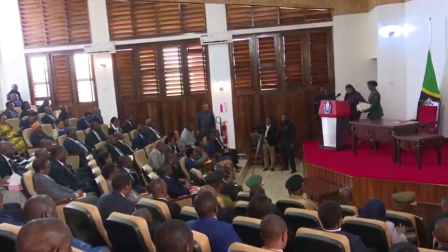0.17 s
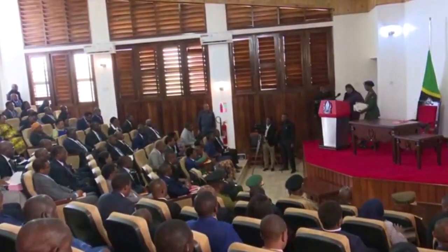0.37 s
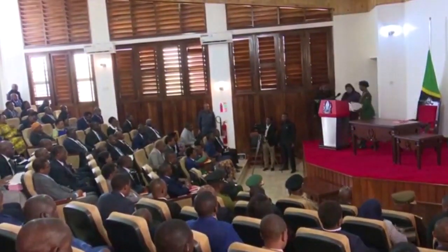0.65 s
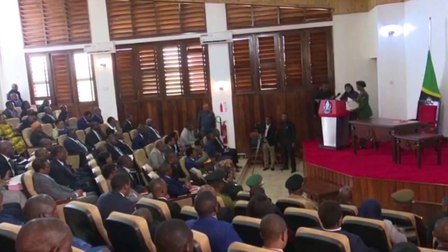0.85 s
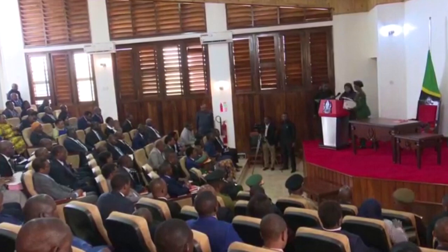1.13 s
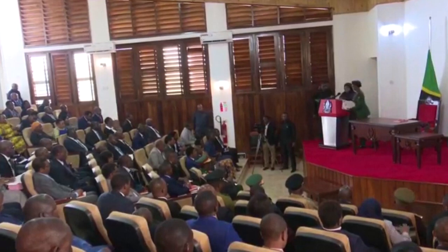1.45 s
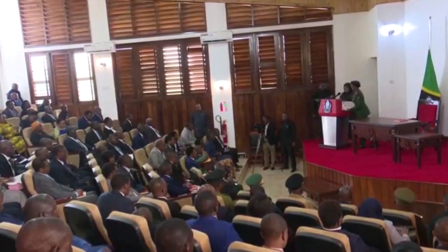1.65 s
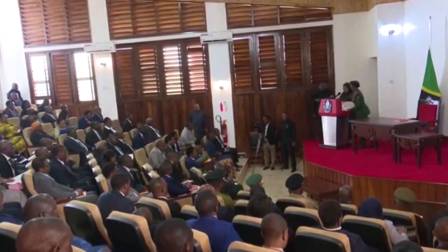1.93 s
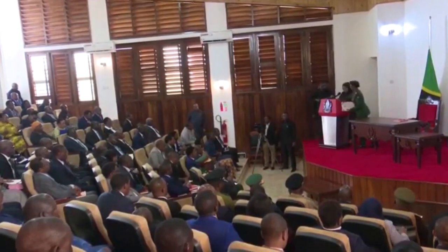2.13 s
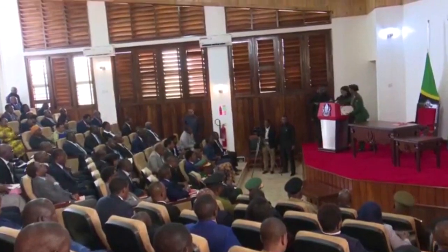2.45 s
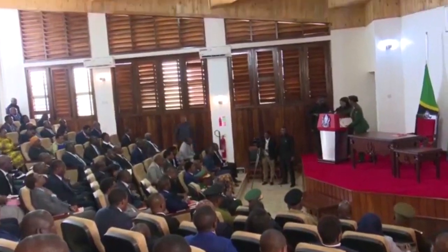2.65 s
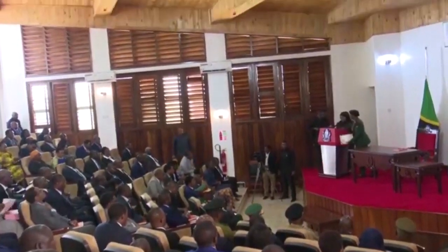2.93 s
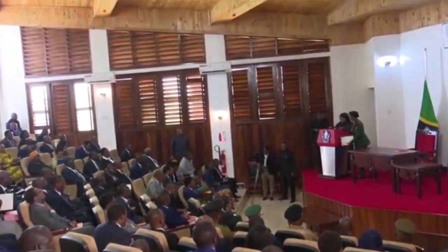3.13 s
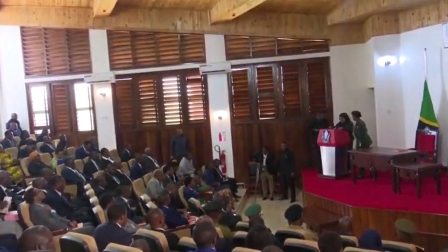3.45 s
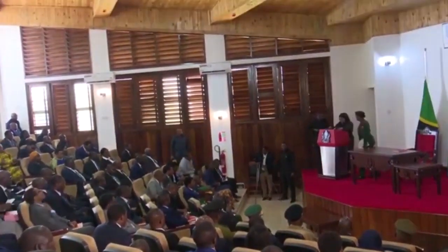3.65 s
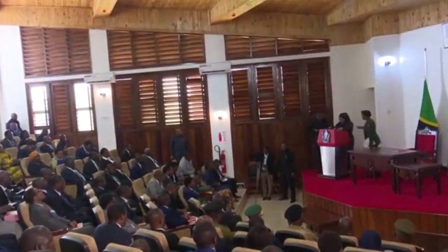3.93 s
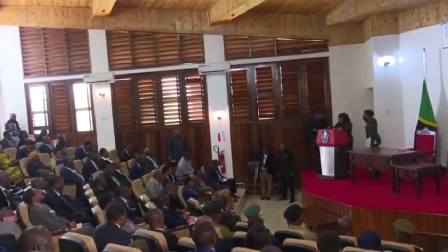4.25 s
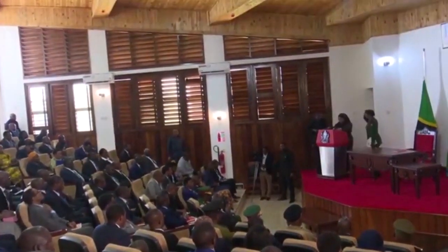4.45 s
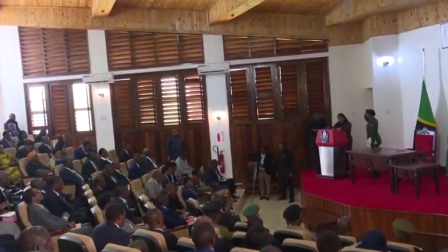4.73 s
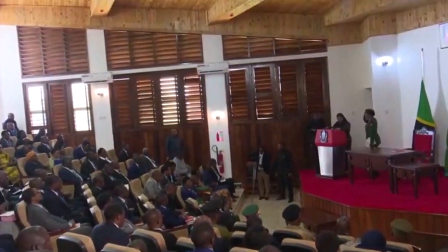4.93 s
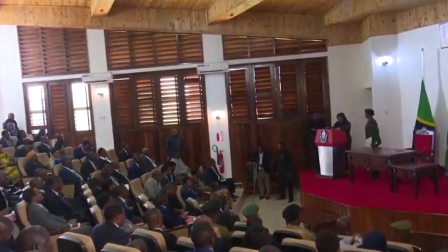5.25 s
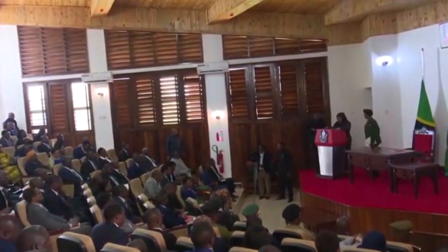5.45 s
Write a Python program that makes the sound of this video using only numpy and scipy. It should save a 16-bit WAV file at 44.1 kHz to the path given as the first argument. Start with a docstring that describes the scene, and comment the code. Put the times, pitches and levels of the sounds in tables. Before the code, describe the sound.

A live microphone on a hall lectern is adjusted by hand. After almost a second of plain hum, whine and hiss, dull low thumps come in a quick cluster, with strong booms near 1.5 and 2.1 seconds. They thin out, bunch again around 3.6, and one heavy boom lands at 5. A sharp plastic click stands out near 4.4. Close, mono, direct from the sound system.

```python
"""In a hall, a lectern microphone is adjusted while it is live on the public address system.
Each nudge booms dully through the stand as a swelling, dying low resonance with an overtone.
Fingers rustle faintly as shaped noise, and the holder clicks a few times in short noise bursts.
Under it the system hums in mains harmonics, buzzes twice a cycle in treble rings,
whines on one steady note and hisses in coloured noise."""
import sys
import numpy as np
from scipy import signal
from scipy.fft import rfft, irfft
from scipy.io import wavfile

SR = 44100
rng = np.random.default_rng(int(sys.argv[2]) if len(sys.argv) > 2 else 0)


def wav_out(sig):
    """Save sig, one row per channel (or a flat mono array), as 16-bit PCM at SR to the path in sys.argv[1]."""
    wavfile.write(sys.argv[1], SR, np.round(np.clip(np.atleast_2d(sig).T, -1, 1) * 32767).astype(np.int16))


N = 246078
TIME = np.arange(N) / SR  # s
MAINS_HZ = 50.124


def amp(db):
    """Decibels to gain."""
    return 10 ** (np.asarray(db) / 20)


def evened(x):
    """Scales to an rms of 1."""
    return x / np.sqrt(np.mean(abs(x) ** 2) + 1e-20)


def noise(points):
    """Gaussian noise whose power density follows points of (frequency_hz, density_db_per_hz)."""
    hz, db = np.transpose(points)
    bins = np.fft.rfftfreq(N, 1 / SR) + 1
    colour = np.interp(np.log(bins), np.log(hz), db)
    white = rfft(rng.standard_normal(N))
    return irfft(white * amp(colour), N) * np.sqrt(SR / 2)


def drift(rate_hz):
    """Random wandering of rms 1: noise that rolls off smoothly around the given rate."""
    roll_off = np.exp(-(np.fft.rfftfreq(N, 1 / SR) / rate_hz) ** 2)
    return evened(irfft(rfft(rng.standard_normal(N)) * roll_off, N))


def add(mix, start_s, sound):
    """Mixes a sound in from start_s, cut off at the end of the mix."""
    part = mix[round(start_s * SR):][:len(sound)]
    part += sound[:len(part)]


def hum(trim_db=-2.0, delay_s=0.00362):
    """Mains harmonics line up into one kick each half cycle."""
    # hum of the sound system: multiple of the mains, level_db (rms, before the trim)
    harmonics = [(4, -57.4), (5, -51.8), (6, -59.0), (7, -55.6), (8, -64.9), (9, -59.5), (10, -67.8),
                 (11, -62.8), (12, -66.6), (13, -65.1), (14, -71.1), (15, -65.7), (16, -71.2), (17, -66.4),
                 (18, -78.9), (19, -66.4), (20, -82.8), (21, -70.2), (23, -72.4), (24, -79.1), (25, -71.9),
                 (27, -79.6), (29, -79.3), (31, -76.8), (33, -81.7), (35, -83.2), (37, -84.3)]
    turns = MAINS_HZ * (TIME - delay_s)
    total = sum(amp(db) * np.cos(2 * np.pi * k * turns) for k, db in harmonics)
    return amp(trim_db) * np.sqrt(2) * total


def whine(trim_db=1, pitch_hz=429.87, waver_turns=0.0086):
    """A steady electronic tone with clean overtones, all sharing one slight waver of phase."""
    # partials of the whine: multiple of the pitch, level_db (rms, before the trim)
    partials = [(1, -47.5), (2, -59), (3, -69.5), (4, -66), (5, -76.5), (6, -74.5), (7, -75)]
    turns = pitch_hz * TIME + waver_turns * drift(2.4)
    total = sum(amp(db) * np.cos(2 * np.pi * (k * turns + rng.random())) for k, db in partials)
    return amp(trim_db) * np.sqrt(2) * total


def buzz(beat_hz=15.5, beat_swing_rad=0.72, wander_rad=0.6):
    """Short treble rings locked to the mains, flipping sign each half cycle, with an uneven beat."""
    # switching spikes in every half cycle of the mains:
    # delay_s, ring_hz, half_length_s (to 1/e), level_db (rms), random share (0-1)
    spikes = [(.0089, 4084, 0.0009, -62, 0.31), (.0022, 3980, 0.0007, -69, 0.9),
              (0.011, 10970, 0.00038, -76, 0), (0.0022, 8060, 0.00049, -72, 0.83)]
    out = np.zeros(N)
    for delay_s, ring_hz, half_length_s, db, share in spikes:
        halves = 2 * MAINS_HZ * (TIME - delay_s)
        nearest = np.round(halves)
        t = (halves - nearest) / (2 * MAINS_HZ)  # time from the nearest spike
        beat = 2 * np.pi * beat_hz * TIME + drift(2.3)
        strength = 1 + 0.25 * np.cos(beat + drift(10)) + 0.15 * drift(60)
        phase = beat_swing_rad * np.sin(beat) + wander_rad * drift(2.2) + np.pi * nearest
        sway = strength * np.exp(1j * phase)
        fizz = evened(drift(450) + 1j * drift(450))
        blend = np.sqrt(1 - share ** 2) * sway + share * fizz
        ring = (blend * np.exp(2j * np.pi * ring_hz * t)).real
        out += amp(db) * evened(ring * np.exp(-(t / half_length_s) ** 2))
    return out


def hiss(swell_db=0.68):
    """The rumble of the hall and the hiss of the amplifier, as one noise with a drifting level."""
    # colour of rumble and hiss: frequency_hz, density_db_per_hz
    colour = [(25, -98), (60, -84), (155, -63.5), (215, -73.5), (300, -77), (600, -86), (1200, -90.5),
              (2500, -97), (4300, -99), (7100, -105), (7700, -99), (8800, -100), (9400, -109),
              (14300, -114)]
    return noise(colour) * amp(swell_db * drift(9.5))


def thumps(tail_db=-29, tail_t60_s=0.63):
    """Nudges and jiggles boom through the stand; the hall returns a faint tail of decaying noise."""
    # nudges of the microphone: peak_s, level_db (main push at its peak), pitch_hz,
    # rise_s (from half height), fall_s (to half height), rebound_db (relative to the push),
    # overtone_db (relative, before the overtone's trim)
    nudges = [(0.924, -25.5, 136, 0.025, 0.015, -25, -16.5),
              (1.0382, -15.5, 131, 0.0063, 0.0063, -8.5, -29),
              (1.1243, -19.5, 162.6, 0.013, 0.0046, -28, -26), (1.184, -28.5, 150, 0.0097, 0.011, -20, -28),
              (1.245, -22.5, 137, 0.0089, 0.0058, 1.5, -37), (1.3646, -19, 139, 0.0063, 0.0079, -29, -31),
              (1.438, -27, 142, 0.0084, .008, -13, -17.5), (1.49, -4, 135.2, .015, 0.017, -29, -19.5),
              (1.56, -18.5, 144, 0.013, 0.0041, 4.5, -17), (1.6446, -23, 137, 0.0094, 0.0075, -10, -28),
              (1.723, -14.5, 130, 0.0055, 0.008, -13, -16), (1.83, -27, 147, 0.0046, .016, -14, -18.5),
              (2.0925, -7, 111.4, .011, 0.0056, -16, -12.5), (2.1975, -24.5, 121, 0.0085, 0.004, -7, -16),
              (2.3934, -18, 128, .011, .011, -25, -25), (2.479, -19, 138, 0.0043, 0.012, -16, -37),
              (2.7883, -16.7, 141.6, 0.0065, 0.0089, -22, -35), (3.068, -31, 145, 0.0069, .006, -20, -14),
              (3.5037, -12.5, 144, 0.0061, 0.0085, -13, -34), (3.566, -22.3, 145, .0042, 0.0077, -20, -34),
              (3.628, -18, 168, 0.007, 0.01, -3, -31), (3.703, -18, 128, 0.013, .007, -1.5, -26),
              (3.7761, -19.5, 149, 0.0077, 0.0071, -3, -33), (3.866, -20.5, 137, .005, 0.0086, -19, -24),
              (4.2003, -25, 130.5, 0.0072, .012, -23, -12.5), (4.356, -25.5, 130, 0.0051, 0.0069, 7, -21),
              (4.763, -32, 144, 0.01, .006, -16, -23), (5.0108, -3, 123.4, 0.0095, 0.0087, -5.5, -29),
              (5.0865, -13, 134.4, 0.0057, 0.02, -25, -27), (5.2943, -25.5, 130, 0.0078, .012, -20, -21.5),
              (5.4856, -26.5, 137, .008, 0.0061, -32, -16.5)]
    out = np.zeros(N)
    for row in [*nudges, *jiggles()]:
        add(out, *nudge(*row))
    t = TIME[:SR]
    tail = rng.standard_normal(SR) * amp(-60 * t / tail_t60_s) * (t > 0.02)
    boom = signal.fftconvolve(out, tail / np.linalg.norm(tail))[:N]
    return out + amp(tail_db) * boom


def jiggles(count=120, rate_per_s=11, half_width_s=0.012):
    """Faint nudges at uneven moments for as long as the hand is on the stand."""
    # the hand rests on the stand and jiggles it: start_s, end_s, typical level_db, typical pitch_hz
    handling = [(.45, 0.831, -37, 177), (0.828, 2.35, -32, 142.6), (2.35, 3.5, -39, 143),
                (3.5, 3.9, -33, 139), (3.9, 4.15, -36, 184), (4.15, 5.5, -38, 137.6)]
    spread_db, spread_octaves = 2.5, 0.16  # furthest either way
    rebound_db, overtone_db = -11.5, -21.5
    for k, (late, size, pitch) in enumerate(rng.uniform(-1, 1, (count, 3))):
        s = (k + late / 2) / rate_per_s
        for start_s, end_s, db, hz in handling:
            if start_s <= s < end_s:
                level_db = db + spread_db * size
                pitch_hz = hz * 2 ** (spread_octaves * pitch)
                yield s, level_db, pitch_hz, half_width_s, half_width_s, rebound_db, overtone_db


def nudge(peak_s, level_db, pitch_hz, rise_s, fall_s, rebound_db, overtone_db):
    """The hand pushes the stand, which then rocks back once at a pitch of its own."""
    rebound_lag_s, rebound_hz = 0.022, 135.3
    rebound_rise_s, rebound_fall_s = 0.0087, 0.0087  # from and to half height
    t = np.arange(-0.06, 0.14, 1 / SR)
    first = push(t, pitch_hz, rise_s, fall_s, overtone_db)
    rebound = push(t - rebound_lag_s, rebound_hz, rebound_rise_s, rebound_fall_s, overtone_db)
    return peak_s + t[0], amp(level_db) * (first + amp(rebound_db) * rebound)


def push(t, pitch_hz, rise_s, fall_s, overtone_db, trim_db=-1, lead=0.26, sag=0.07, sag_s=0.011):
    """One push swells and dies in two low resonances of the stand, the main one peaking at t = 0."""
    second_hz = 247.7  # second resonance of the stand
    # the pitch sags a little as the hand lets go
    turn = 2 * np.pi * (t - sag * sag_s * np.log(np.cosh(t / sag_s)))
    # the overtone peaks early, while the hand still pushes; its lead is a share of the rise
    early = swell(t + lead * rise_s, rise_s, fall_s)
    overtone = amp(overtone_db + trim_db) * early * np.cos(second_hz * turn)
    return swell(t, rise_s, fall_s) * np.cos(pitch_hz * turn) + overtone


def swell(t, rise_s, fall_s):
    """A bell-shaped rise from half height to 1 at t = 0, then a ringing decay's envelope."""
    rising = 2 ** -((t / rise_s) ** 2)
    falling = 1 / np.cosh(np.arccosh(2) * t / fall_s)
    return np.where(t < 0, rising, falling)


def rub(grain_db=2.5):
    """A faint rustle of fingers on the stand: grainy noise swelling and fading with each stroke."""
    # fingers sliding on the stand: middle_s, level_db (at the middle), width_s (at half height)
    slides = [(1.45, -53, .09), (1.8, -50.5, 0.084), (2.18, -52.5, .12), (4.36, -48, 0.17),
              (5.02, -52.5, 0.32), (5.56, -55, 0.16)]
    # colour of the rustle: frequency_hz, density_db_per_hz (only the shape counts)
    colour = [(200, 16), (700, 8.5), (1500, -1.5), (3500, -3), (5500, -9), (8000, -11), (14000, -22)]
    strokes = sum(amp(db) * 2 ** -((2 * (TIME - s) / width_s) ** 2) for s, db, width_s in slides)
    return strokes * evened(noise(colour) * amp(grain_db * drift(200)))


def clicks():
    """Plastic slips in the holder: a narrow ring, a wider crack just after it, and a short tail."""
    # clicks of the holder: start_s, ring_db, ring_hz, crack_db, crack_hz, crack_spread_octaves, tail_db
    slips = [(1.787, -60, 6500, -50, 5500, .5, -64), (2.21, -50, 2700, -42, 3000, .7, -60),
             (2.6056, -36, 2480, -41, 4200, .25, -47.5), (4.3734, -23.5, 3560, -27, 2750, 1, -48),
             (5.361, -44, 4700, -39, 4200, 0.73, -62)]
    ring_octaves, ring_s = 0.19, 0.00095
    crack_lag_s, crack_s = 0.0007, 0.0017
    tail_octaves, tail_s = 0.35, 0.016
    out = np.zeros(N)
    for s, ring_db, ring_hz, crack_db, crack_hz, crack_octaves, tail_db in slips:
        add(out, s, amp(ring_db) * crack(ring_hz, ring_octaves, ring_s))
        add(out, s + crack_lag_s, amp(crack_db) * crack(crack_hz, crack_octaves, crack_s))
        add(out, s, amp(tail_db) * crack(ring_hz, tail_octaves, tail_s))
    return out


def crack(hz, octaves, decay_s, attack_s=0.00058, size=4096):
    """A brief burst of noise in a bell-shaped band around one frequency."""
    t = TIME[:size]
    bins = np.fft.rfftfreq(size, 1 / SR) + 1
    bell = np.exp(-0.5 * (np.log2(bins / hz) / octaves) ** 2)
    band = irfft(rfft(rng.standard_normal(size)) * bell, size)
    burst = (1 - np.exp(-t / attack_s)) * np.exp(-t / decay_s)
    # every burst carries the energy of its envelope, however narrow the band
    return evened(band * burst) * np.sqrt(np.mean(burst ** 2))


def scene():
    """Everything meets in the one channel of the sound system."""
    system = hum() + whine() + buzz() + hiss()
    handled = thumps() + rub() + clicks()
    return (system + handled)[None]


def record(dry, low_cut_hz=42, edge_hz=14800):
    """The low cut of the mixing desk, then the band limit of the recorder."""
    hz = np.fft.rfftfreq(N, 1 / SR)
    cut = irfft(rfft(dry) * (1 - np.exp(-(hz / low_cut_hz) ** 4)), N)
    band_limit = signal.firwin(511, edge_hz, window=("kaiser", 9), fs=SR)
    return signal.oaconvolve(cut, band_limit[None], "same")


dry = scene()
out = record(dry)
wav_out(out)
```